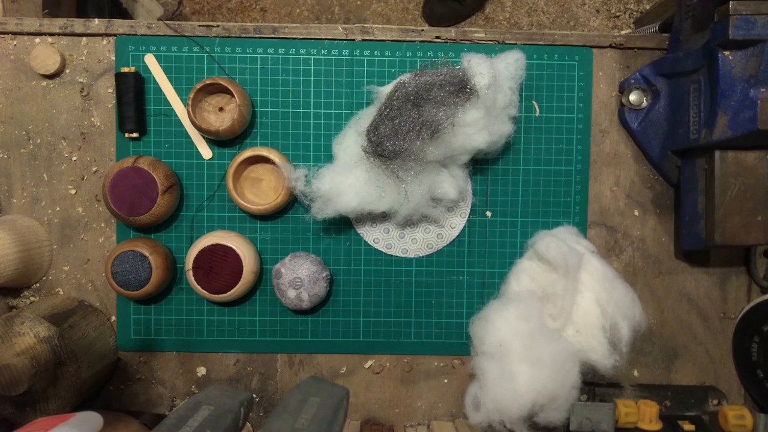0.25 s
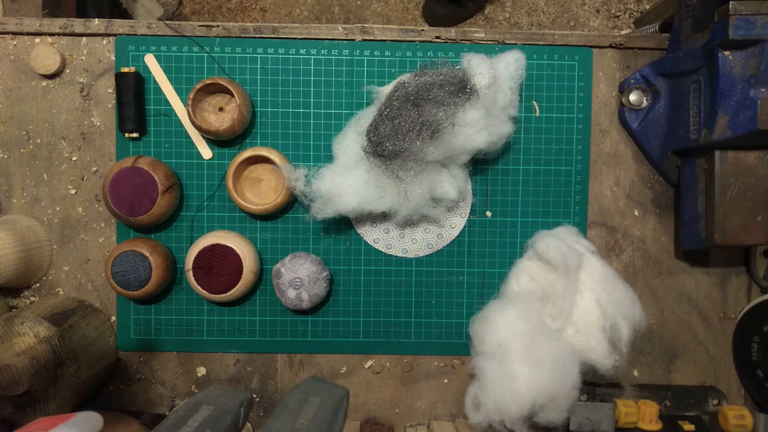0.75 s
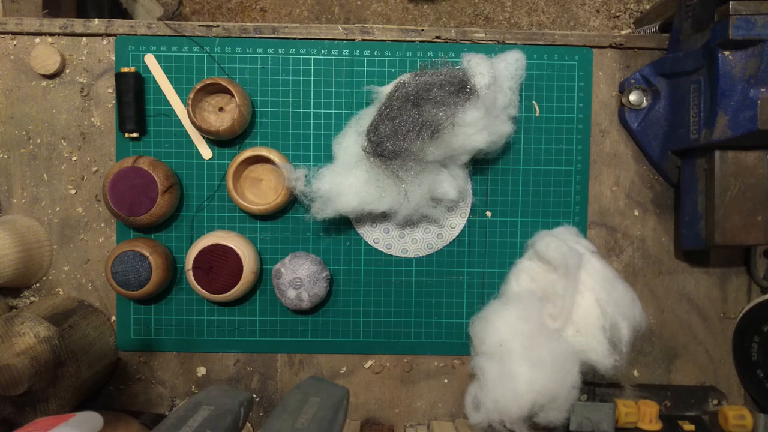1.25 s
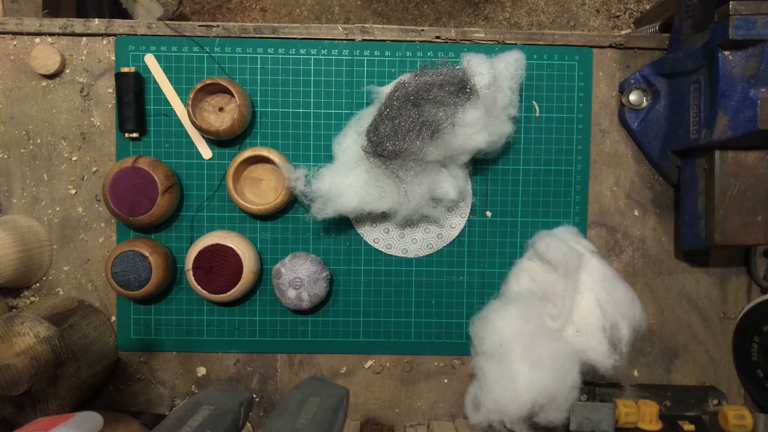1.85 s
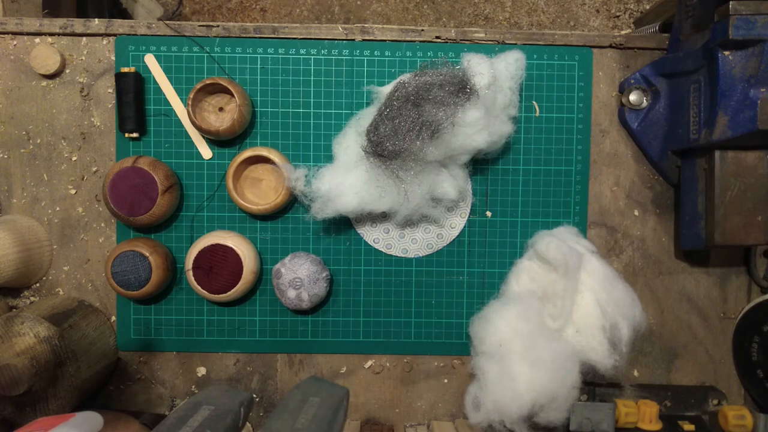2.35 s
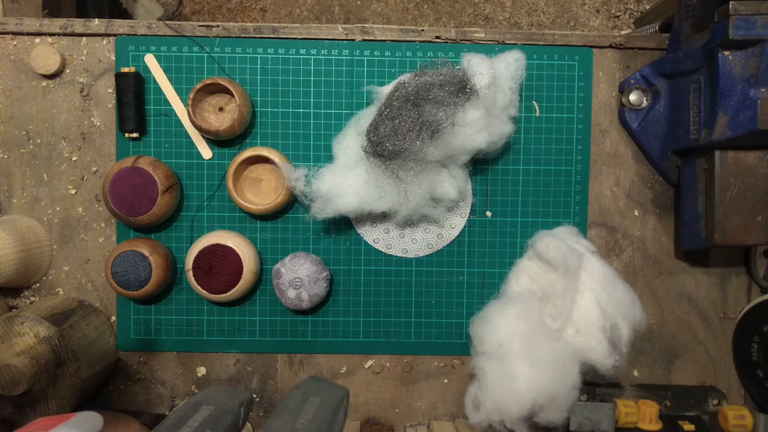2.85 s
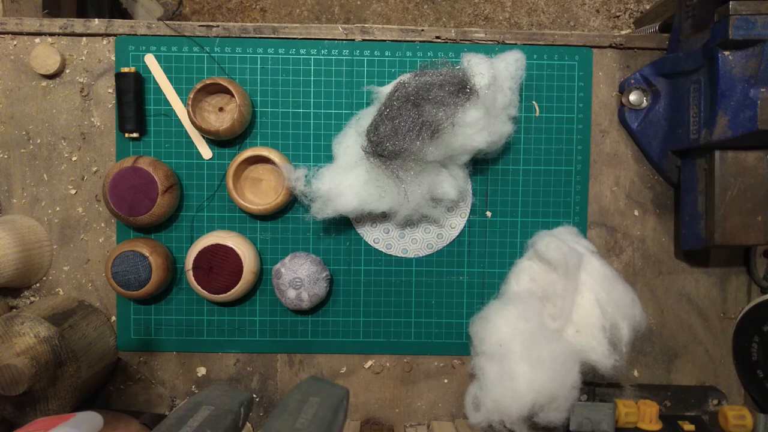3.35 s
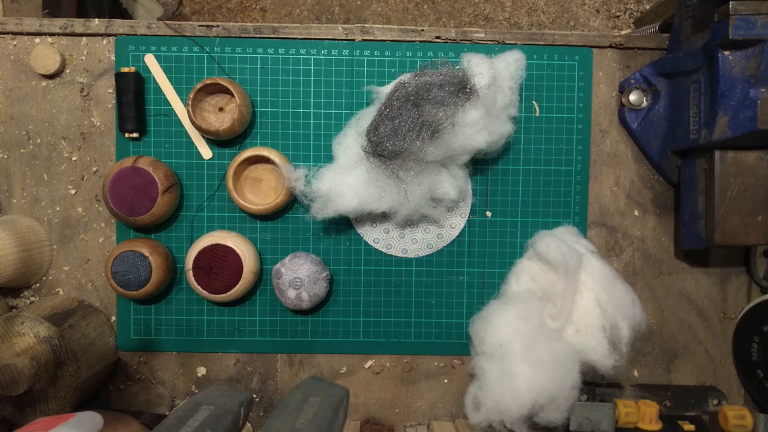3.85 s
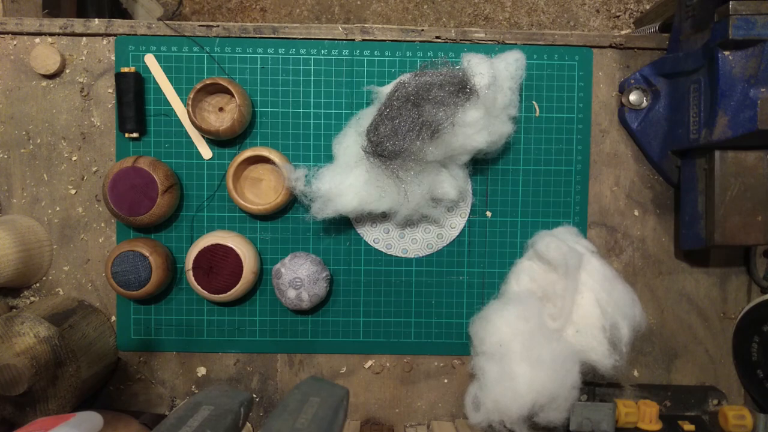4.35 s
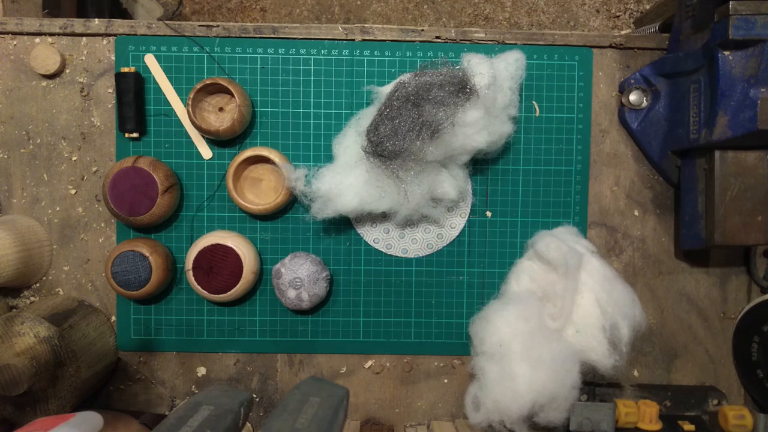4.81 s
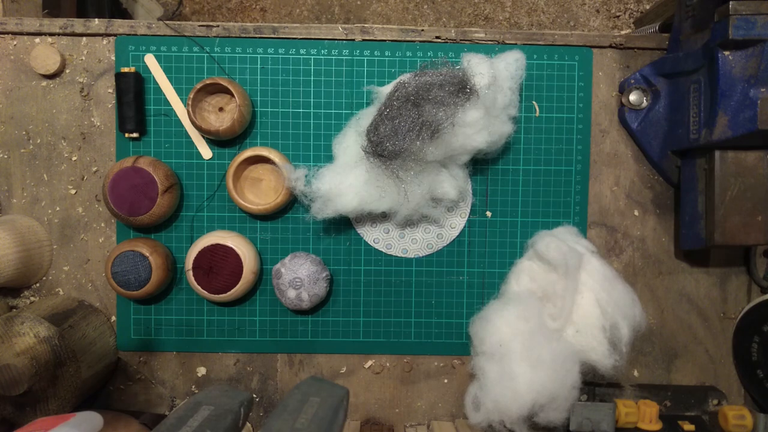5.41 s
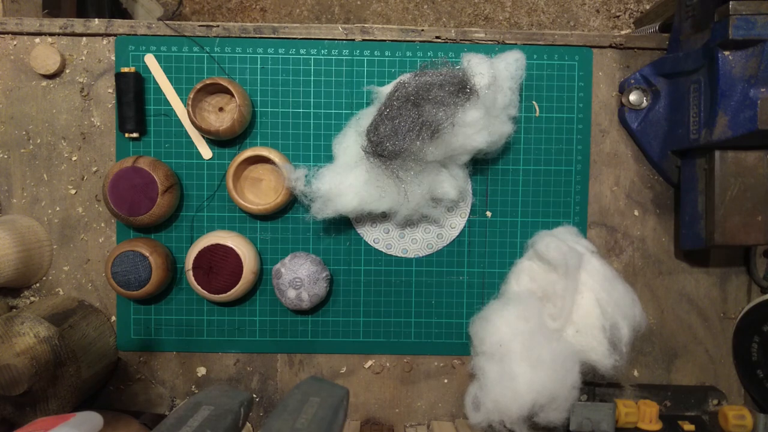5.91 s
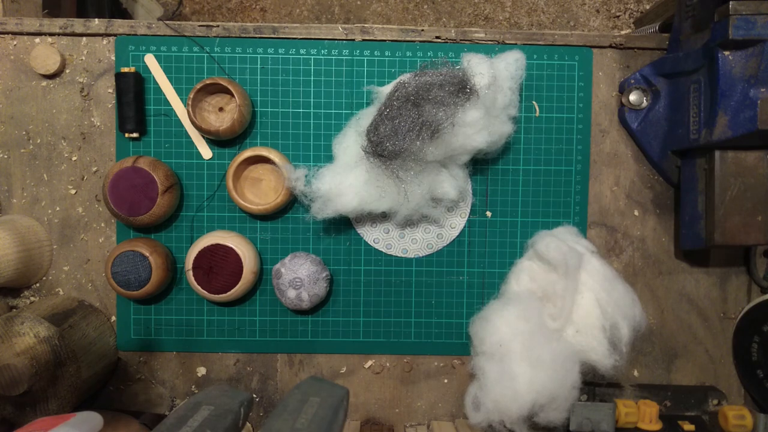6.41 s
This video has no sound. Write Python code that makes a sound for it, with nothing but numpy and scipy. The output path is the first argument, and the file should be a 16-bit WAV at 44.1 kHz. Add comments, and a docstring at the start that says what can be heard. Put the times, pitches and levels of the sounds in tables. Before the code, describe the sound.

A quiet workshop, heard close in stereo with short, dull echoes. From 0 to 0.7 s, soft stuffing and steel wool are rubbed in quick, light strokes: a grainy mid rustle, tiny wiry crackles and a bright airy hiss. Handling then thins to faint touches. At about 1.0 s a tool moves slightly, and at 1.25 s it clinks on the bench with a thin metallic ring, cut short after 1.4 s. A faint slide and tiny taps follow to 1.9 s, then near quiet. At 2.78 s a wooden piece knocks hard and bounces, rattling out by 3.1 s. From 3.25 s rustling returns, fullest around 3.9 to 4.6 s, with small clicks near 3.5 and 5.3 s and dull low knocks around 5.85 s. It fades after 6.3 s. Low rumble swells unevenly throughout; a faint far engine throbs from 3 to 5.6 s, rising then falling in pitch.

```python
"""A soft rustle, as stuffing and steel wool are handled on a bench, with a bright hiss that follows it.
Low rumble swells and sinks below. These are shaped stereo noise; tool, wood and bench are ringing notes.
A metal tool slides and clinks, a wooden piece drops and bounces, and small knocks come and go.
Later a far engine note, one gliding sine, throbs. Short echoes of the shop follow the blows."""
import sys
import numpy as np
from scipy import signal
from scipy.io import wavfile

SR = 44100
rng = np.random.default_rng(int(sys.argv[2]) if len(sys.argv) > 2 else 0)


def bounce(signal):
    """Save signal as a 16-bit WAV file at the path given by the first command-line argument."""
    frames = np.transpose(np.atleast_2d(signal))
    limited = np.clip(frames, -1, 1)
    pcm = np.round(limited * 32767).astype(np.int16)
    wavfile.write(sys.argv[1], SR, pcm)


N = 294147

# Level of the low rumble before the bass cut: t/s, level/dB
RUMBLE_LEVEL = [(0.0, -47), (1.13, -64), (1.26, -45), (1.52, -56), (2.71, -61), (2.8, -35), (3.03, -42),
                (3.1, -57.5), (3.94, -55.5), (4.07, -49.5), (4.18, -57.5), (5.31, -58), (5.39, -45.5),
                (5.52, -63), (5.66, -47.5), (5.81, -49), (5.89, -41), (5.93, -60.5), (6.18, -40.5),
                (6.67, -53)]
# Tone balance of the rumble: f/Hz, level per Hz/dB
RUMBLE_SPECTRUM = [(20, -48), (36, -25), (52, -3.5), (66, 5.5), (85, -6), (110, -29), (150, -52)]
# Tone balance of the quiet shop: f/Hz, level per Hz/dB
QUIET_SPECTRUM = [(71, -9), (120, -14.5), (181, -10), (643, -12.5), (789, -18), (968, -12.5), (1210, -17),
                  (6630, -28), (15000, -25.5), (16000, -31)]
# How alike left and right are (1 = the same, 0 = unrelated): f/Hz, likeness
LIKENESS_CURVE = [(60, 1), (200, 0.76), (400, 0.89), (700, 0.74), (1300, 0.085), (2400, 0.13),
                  (4400, -0.097), (8000, 0.88), (14000, 0.94)]
# Strokes of the rustle, with hiss and murmur: start t/s, length/s, swell from start to end/dB,
# rustle level halfway/dB, hiss above the rustle/dB, murmur above the rustle/dB
RUB_STROKES = [(0.004, 0.052, -11, -53.5, 0, -11), (0.07, 0.062, 0.5, -58, 0.5, -13),
               (0.159, 0.073, -0.5, -62.5, 4.5, -4.5), (0.255, 0.11, -1, -54, 1, -10),
               (0.384, 0.073, -2, -52, 1.5, -11), (0.442, 0.088, 5, -53, 1.5, -13),
               (0.56, 0.041, 0.5, -56, -1.5, -11), (0.644, 0.03, -2, -66.5, -1, -16),
               (0.759, 0.14, -14, -80.5, -3, 2), (1.026, 0.046, 0, -65.5, -11, 9.5),
               (1.098, 0.12, -10, -75, -4.5, 1), (1.269, 0.085, -4.5, -57.5, -14, 9.5),
               (1.384, 0.032, 7, -71.5, 3.5, 3), (1.429, 0.48, -16, -76, -9, 7),
               (1.648, 0.036, 0, -63.5, -14, 5.5), (1.696, 0.17, 1, -65.5, -7.5, 3),
               (1.819, 0.036, -2, -73, -3, 0), (1.903, 0.02, -2, -75.5, 8, 6),
               (2.086, 0.062, -1, -80.5, 3.5, 4), (2.349, 0.12, 3, -81, 4.5, 4.5),
               (2.827, 0.23, -4, -71, 3, 10), (3.242, 0.027, -1.5, -64, 0.5, -7),
               (3.311, 0.14, -2, -58, 4.5, -8.5), (3.46, 0.075, 1.5, -53.5, 2.5, -7),
               (3.574, 0.065, 4, -59.5, 4, -6), (3.652, 0.084, 1.5, -54.5, 4, -13),
               (3.759, 0.11, 9, -53.5, 0, -18), (3.871, 0.048, 2, -45.5, 1, -22),
               (3.947, 0.1, -8.5, -49, 0.5, -11), (4.068, 0.041, 2.5, -56, 7, -16),
               (4.119, 0.062, 2.5, -54, 2.5, -16), (4.227, 0.095, 2.5, -50.5, 0.5, -21),
               (4.349, 0.1, -4.5, -48.5, -0.5, -21), (4.447, 0.13, 8, -53, 1, -10),
               (4.593, 0.158, 0, -52, 1, -11), (4.789, 0.11, 5.5, -63, 2, -5),
               (4.919, 0.075, 3, -52, -1, -10.5), (5.026, 0.12, 0, -63.5, 1, -6),
               (5.186, 0.061, 1.5, -61.5, 2.5, -14), (5.293, 0.094, 1.5, -59.5, -3.5, -4.5),
               (5.409, 0.1, -1, -66, 1, -1), (5.543, 0.026, -4, -56, -2.5, -5),
               (5.589, 0.057, -2, -57.5, -0.5, -6), (5.655, 0.078, -0.5, -49, -6, -7),
               (5.769, 0.082, 10, -53.5, -1, -4), (5.869, 0.12, 5, -60, -1.5, -3),
               (5.996, 0.091, -3, -57, -4.5, -8), (6.086, 0.037, 5, -52.5, -1.5, -4.5),
               (6.146, 0.11, 4.5, -50, -2, -2), (6.271, 0.131, 3.5, -62, -2, -7),
               (6.435, 0.096, -4, -68.5, -14, 1), (6.56, 0.13, 6, -75.5, -19, -2)]
# Tone balances of the hiss, rustle and murmur: f/Hz, level per Hz/dB
HISS_SPECTRUM = [(1290, -1), (2200, -3), (2350, -1), (4920, -5), (6310, -10), (9100, -10.5), (14800, -6.5),
                 (16000, -8)]
RUSTLE_SPECTRUM = [(150, -44), (250, -12), (364, -8.5), (406, -3.5), (627, -2.5), (808, -6), (957, -2.5),
                   (1090, -5.5), (1340, -3), (4500, -26), (5850, -57), (9900, -120)]
MURMUR_SPECTRUM = [(110, -53), (140, 2.5), (180, -5), (230, -10), (320, -14)]
# Hollow things the rustle rings in: f/Hz, width/Hz, level/dB
HOLLOW_TONES = [(414, 28, -1), (491, 82, 0.5), (612, 22, 3), (952, 93, 2.5), (1370, 35, 2.5),
                (2010, 27, 6.5), (2472, 16, 9), (3470, 91, 10)]
# Sudden rises or dips of the rustle and hiss, fading back: t/s, jump in level/dB, fade to 1/e /s
LEVEL_JUMPS = [(0.256, 1.5, 0.1), (.65, 8.5, 0.013), (1.021, 2, 0.025), (1.41, -6, 0.024),
               (1.652, -0.5, 0.019), (3.307, -2, 0.016), (3.522, 2.5, 0.028), (3.632, 5, 0.056),
               (4.159, -1.5, 0.0078), (4.842, 7, 0.015), (5.31, 6, 0.012), (5.384, 5.5, 0.0097),
               (5.656, 3.5, 0.046), (5.835, -1, 0.012), (6.09, 1, 0.031)]
# The tool slides: start t/s, end t/s, then the modes that sing are those whose
# t60 in TOOL_MODES lies between: shortest t60/s, longest t60/s
SLIDE_TIMES = [(1.02, 1.18, 0, .2), (1.65, 1.93, .2, .72)]
# Drive for each slide: song of the tool level/dB, shaking of the bench level/dB
SLIDE_DRIVES = [(-96, -96.5), (-101, -89)]
# Ringing modes of the steel tool: f/Hz, level/dB, t60 (time to fall 60 dB)/s
TOOL_MODES = [(728, -15.5, 0.6), (884, -8, 0.062), (1297, -15.5, 1.34), (1656, -4.5, 0.095),
              (2005, -13, 0.57), (1980, -15, 1.36), (2880, -12, 0.033), (2994, 15.5, 0.029),
              (3100, -12, 0.06), (3587, -14, 0.61), (3885, -4.5, 0.3), (4070, -21, 0.75), (4360, -27, 1.1),
              (4640, -6.5, 0.09), (5880, -7, 0.45), (6955, -16.5, 1.8), (9300, -43, 0.14), (9787, -35, 1.2)]
# Modes of the bench top: f/Hz, level under the tool/dB, level under the wood/dB, t60/s
BENCH_MODES = [(56.3, -2, -7, 0.25), (104.9, 2, -18, 0.49), (153.4, -34, -0.5, 0.29), (184, 5.5, 0.5, 0.19),
               (284, -22, -3.5, 0.15), (332, -3.5, -8.5, 0.11), (410, 3.5, -25, 0.072), (542, 5, -2, 0.048)]
# Small knocks, each on a thing of its own, before softening: t/s, level/dB, f/Hz, t60/s
KNOCK_NOTES = [(1.03, -60, 167, 0.25), (1.83, -54, 1550, 0.11), (1.841, -53, 1995, 0.12),
               (3.25, -53, 677, 0.072), (3.501, -41, 1295, 0.056), (4.583, -43.5, 193.2, 0.095),
               (5.311, -41, 1610, 0.03), (5.313, -46, 3750, 0.04), (5.341, -37, 1370, 0.064),
               (5.359, -49, 137, 0.16), (5.838, -32.5, 166, 0.071), (5.87, -32, 69.4, 0.05)]
# Contacts of the clinking tool: t/s, ring level/dB, thump level/dB, clatter level/dB
CLINK_HITS = [(1.2535, -34.5, -51, -8), (1.263, -62, -36.5, -5), (1.299, -59, -44, -12)]
# Contacts of the wood: t/s, knock level/dB, thump level/dB, crack level/dB, bright edge level/dB,
# fade of the contact to 1/e /s (20 ms at most is used)
DROP_HITS = [(2.779, -33, -52, -41, -60, 0.0046), (2.788, -23.5, -28.5, -8.5, -24, 0.014),
             (2.808, -44, -34, -11.5, -38, 0.014), (2.83, -36, -45, -11, -49, 0.013),
             (2.838, -27.5, -32, -8.5, -46, 0.015), (2.911, -42.5, -50, -18.5, -50, 0.022),
             (2.971, -36.5, -44, -30, -55, 0.013), (3.055, -40.5, -63, -30, -62, 0.01),
             (3.121, -80, -69, -33.5, -58, 0.005)]
# Modes of the wooden piece: f/Hz, level/dB, t60/s
WOOD_MODES = [(480, -2, 0.038), (720, -4, 0.025), (944, 0.5, 0.042), (1120, -8, 0.032), (1320, -4, 0.032),
              (1810, -7.5, 0.017), (2260, -10, 0.017), (2860, -8, 0.011)]
# Far engine before its throb: t/s, f/Hz, level/dB
ENGINE_GLIDE = [(3.05, 87.1, -52.5), (3.31, 89.7, -47.5), (3.6, 95.8, -48), (3.9, 100.2, -41.5),
                (4.29, 109.8, -51.5), (4.71, 115.3, -46), (5.0, 112, -53), (5.31, 100, -64),
                (5.6, 91, -54.5)]
# Times when the engine note nearly dies: t/s
ENGINE_LULLS = [2.98, 3.2, 3.51, 3.77, 3.95, 4.14, 4.33, 4.47, 4.6, 4.75, 4.93, 5.28, 5.6]

QUIET_DB = -73.5
RUB_RISE_DB_PER_S, RUB_FALL_DB_PER_S = 995, 495
WAVER_SPREAD_DB, WAVER_RATE_HZ = 1.23, 22   # the level wavers at random
RING_CUT_S, RING_FADE_S = 1.408, 0.068   # from here the metal ring fades quickly, to 1/e in this time
RIGHT_LAG_S = 0.00018   # the tool and the small knocks reach the left microphone first
WOOD_SPREAD_HZ = 1050   # from here up the rattle reaches each microphone differently
THROB_DEPTH = 0.84   # share of the engine note that dies in each lull
SHOP_T60_S, WALL_CUT_HZ, SHOP_DB = 0.28, 2470, -13.5   # treble dies sooner than this t60
LEFT_OVER_RIGHT_DB = 2.5
BASS_CUT_HZ, TOP_CUT_HZ = 46, 15740


def amp(db):
    """Turn decibels into a gain."""
    return 10 ** (np.asarray(db) / 20)


def unit(x):
    """Scale to rms 1."""
    return x / np.sqrt(np.mean(x ** 2) + 1e-20)


def in_time(rows):
    """Read each column of a curve at every sample."""
    times, *columns = np.transpose(rows)
    return [np.interp(np.arange(N) / SR, times, column) for column in columns]


def at_hz(points, hz):
    """Read a spectrum on a log-frequency axis."""
    points = np.array(points)
    return np.interp(np.log(hz), np.log(points[:, 0]), points[:, 1])


def bandpass(x, low_hz, high_hz):
    """Keep mostly what lies between two frequencies."""
    return signal.sosfilt(signal.butter(2, [low_hz, high_hz], "band", fs=SR, output="sos"), x)


def drift(rate_hz):
    """Slow random wander of rms 1: smoothed noise, made at every 40th sample."""
    r = np.exp(-80 * np.pi * rate_hz / SR)
    noise = rng.standard_normal(N // 40 + 2002)
    slow = signal.lfilter([1], [1, -2 * r, r * r], noise)[2000:]   # skip the filter's start
    return np.interp(np.arange(N) / 40, np.arange(len(slow)), unit(slow))


def ring(force, hz, t60):
    """A resonance: a unit click starts a fading sine of height 1; t60 is at least 10 ms."""
    r = np.exp(-np.log(1000) / (max(t60, .01) * SR))
    w = 2 * np.pi * hz / SR
    return signal.lfilter([0, np.sin(w)], [1, -2 * r * np.cos(w), r * r], force + 1e-18)


def clicks(times, db):
    """Single-sample pushes."""
    out = np.zeros(N)
    out[(times * SR).astype(int)] = amp(db)
    return out


def bursts(times, db, fades):
    """Rough contacts: fading noise, each with the energy of one click."""
    out = np.zeros(N)
    for time, level_db, fade in zip(times, db, fades):
        envelope = np.exp(-np.arange(2000) / SR / np.clip(fade, .0005, .02))
        noise = envelope * rng.standard_normal(2000)
        at = round(time * SR)
        out[at:at + 2000] += amp(level_db) * noise / np.sqrt(np.sum(noise ** 2))
    return out


def coloured(spectrum, patchy_db, grain_db):
    """Stereo noise of rms 1 in roughly third-octave bands, with shared and separate flicker, and grain."""
    low_hz, high_hz = spectrum[0][0], spectrum[-1][0]
    edges = np.geomspace(low_hz, high_hz, int(3 * np.log2(high_hz / low_hz)) + 2)
    grain = amp(grain_db * np.minimum(rng.exponential(1, N), 5))
    white = rng.standard_normal((2, 2, N)) * grain
    out, together = 0, drift(36.7)
    for k, (low, high) in enumerate(zip(edges, edges[1:])):
        mid, side = bandpass(white[k % 2], low, high)   # neighbouring bands use different noise
        hz = np.sqrt(low * high)
        alike = np.clip(at_hz(LIKENESS_CURVE, hz), -1, 1)
        gain = amp(at_hz(spectrum, hz) + patchy_db * (together + 1.14 * drift(5.27)))
        out = out + gain * (np.sqrt(1 + alike) * mid + np.sqrt(1 - alike) * side * [[1], [-1]])
    return unit(out)


def rumble():
    """Low rumble that swells and sinks: deep noise that follows a level curve."""
    level_db, = in_time(RUMBLE_LEVEL)
    return amp(level_db) * coloured(RUMBLE_SPECTRUM, patchy_db=-1.23, grain_db=0.0)


def quiet_shop():
    """The quiet of the shop: faint noise at a steady average level."""
    return amp(QUIET_DB) * coloured(QUIET_SPECTRUM, patchy_db=1.1, grain_db=-2.0)


def rubs():
    """Gains of rustle, hiss and murmur: each rub rises, swells or sinks evenly, and falls; powers add."""
    t = np.arange(0, N, 64) / SR
    start, length, swell_db, rustle_db, hiss_db, murmur_db = np.transpose(RUB_STROKES)[:, :, None]
    end = start + length
    shape_db = rustle_db + swell_db * (np.clip((t - start) / length, 0, 1) - .5)
    shape_db = shape_db - RUB_RISE_DB_PER_S * np.maximum(start - t, 0)
    shape_db = shape_db - RUB_FALL_DB_PER_S * np.maximum(t - end, 0)
    waver = amp(WAVER_SPREAD_DB * drift(WAVER_RATE_HZ))
    gains = []
    for above_db in (0, hiss_db, murmur_db):
        total = np.sqrt(np.sum(amp(shape_db + above_db) ** 2, axis=0))
        gains.append(waver * np.interp(np.arange(N) / SR, t, total))
    return gains


def hollowed(x):
    """Hollow things nearby colour a sound with narrow resonances."""
    out = x.copy()
    for hz, width, db in HOLLOW_TONES:
        r = np.exp(-np.pi * width / SR)
        top = np.array([1, 0, -1]) * (1 - r * r) / 2
        bottom = [1, -2 * r * np.cos(2 * np.pi * hz / SR), r * r]
        out += amp(db) * signal.lfilter(top, bottom, x)
    return unit(out)


def crackle(per_s, cycles):
    """Wires snap past each other: brief rings dealt at random to 24 pitches, each placed in stereo."""
    sizes = amp(2.0 * np.minimum(rng.exponential(1, N), 5)) * rng.choice([-1, 1], N)
    sizes = sizes * (rng.random(N) < per_s / SR)   # keep about per_s snaps a second
    pitches, dealt = np.geomspace(700, 6000, 24), rng.integers(0, 24, N)
    out = np.zeros((2, N))
    for k, hz in enumerate(pitches):
        snaps = ring(sizes * (dealt == k), hz, cycles / hz) / np.sqrt(hz)
        sides = [[1], [rng.uniform(-1.14, 1)]]
        out += snaps * sides[::(-1) ** k]   # left and right swap roles from pitch to pitch
    return unit(out)


def handling():
    """A soft mid rustle with snaps, a bright hiss that swells and drops along with it, and a low murmur."""
    t = np.arange(N) / SR
    jumps_db = np.zeros(N)
    for start, jump_db, fade in LEVEL_JUMPS:
        jumps_db += jump_db * (t >= start) * np.exp(-np.maximum(t - start, 0) / fade)
    rustle_gain, hiss_gain, murmur_gain = rubs()
    hiss = hiss_gain * coloured(HISS_SPECTRUM, patchy_db=0.99, grain_db=1.5)
    rustle = rustle_gain * hollowed(coloured(RUSTLE_SPECTRUM, patchy_db=1.5, grain_db=3.0))
    murmur = murmur_gain * coloured(MURMUR_SPECTRUM, patchy_db=3.5, grain_db=2.0)
    snaps = rustle_gain * amp(-6) * crackle(per_s=450, cycles=17)
    return amp(jumps_db) * (hiss + rustle + snaps) + murmur


def sliding():
    """Friction noise makes some modes of the tool sing faintly, and other noise shakes the bench."""
    t, out = np.arange(N) / SR, np.zeros(N)
    rub = bandpass(rng.standard_normal(N), 1700, 4500)
    for (start, end, shortest, longest), (song_db, bench_db) in zip(SLIDE_TIMES, SLIDE_DRIVES):
        moving = (t > start) & (t < end)
        fading = np.exp(-np.maximum(t - end, 0) / .015)   # song and shaking fade quickly after the slide
        friction = amp(song_db + 2.8 * drift(15.0)) * rub * moving
        shake = amp(bench_db + 5.0 * drift(28.0)) * rng.standard_normal(N) * moving
        # the modes ring half as long here, and their levels in dB are halved
        song = sum(amp(db / 2) * ring(friction, hz, t60 / 2)
                   for hz, db, t60 in TOOL_MODES if shortest < t60 < longest)
        bench = sum(ring(shake, hz, t60) for hz, _, _, t60 in BENCH_MODES[3:])
        out += fading * (song + bench)
    return out


def knocks():
    """Small things are nudged, each with one note, dulled by a soft contact."""
    out = np.zeros(N)
    for time, db, hz, t60 in KNOCK_NOTES:
        nudge = np.zeros(N)
        nudge[round(time * SR)] = amp(db)
        out += ring(nudge, hz, t60)
    return signal.lfilter([.3], [1, -.7], out)


def thump(times, db, column):
    """The bench top booms under a blow; the striking thing's column sets the strength of each mode."""
    pushes = clicks(times, db)
    return sum(amp(mode[column]) * ring(pushes, mode[0], mode[3]) for mode in BENCH_MODES)


def clatter(times, db, fades, low_hz, high_hz):
    """The broad crack of a contact: a band of noise bursts."""
    return bandpass(bursts(times, db, fades), low_hz, high_hz)


def clink():
    """A steel tool lands: thin ringing modes, a thump and a crack."""
    times, ring_db, thump_db, clatter_db = np.transpose(CLINK_HITS)
    taps = clicks(times, ring_db)
    fading = np.exp(-np.maximum(np.arange(N) / SR - RING_CUT_S, 0) / RING_FADE_S)
    rings = np.zeros(N)
    for k, (hz, db, t60) in enumerate(TOOL_MODES):
        rings += (-1) ** k * amp(db) * ring(taps, hz, t60)   # neighbours start in opposite directions
    crack = clatter(times, clatter_db, np.full(len(times), .012), 320, 2350)
    return fading * rings + thump(times, thump_db, 1) + crack


def drops():
    """A wooden piece hits the bench and bounces to rest: rough contacts drive its short modes."""
    times, knock_db, thump_db, crack_db, edge_db, fades = np.transpose(DROP_HITS)

    def rattle(modes):
        return sum(ring(bursts(times, knock_db + db, fades), hz, t60) for hz, db, t60 in modes)

    low_modes = [mode for mode in WOOD_MODES if mode[0] < WOOD_SPREAD_HZ]
    high_modes = [mode for mode in WOOD_MODES if mode[0] >= WOOD_SPREAD_HZ]
    shared = thump(times, thump_db, 2) + clatter(times, edge_db, fades, 5500, 15500) + rattle(low_modes)
    # fresh noise for each microphone
    spread = [clatter(times, crack_db, fades, 1130, 3870) + rattle(high_modes) for _ in range(2)]
    return shared + np.array(spread)


def engine():
    """One low order of a far motor: a single sine that throbs as it glides."""
    hz, level_db = in_time(ENGINE_GLIDE)
    t = np.arange(N) / SR
    fade_in = np.clip((t - ENGINE_GLIDE[0][0]) / 0.027, 0, 1)
    fade_out = np.clip((ENGINE_GLIDE[-1][0] - t) / 0.036, 0, 1)
    throbs = np.interp(t, ENGINE_LULLS, np.arange(len(ENGINE_LULLS)))   # a whole number at each lull
    throb = 1 - THROB_DEPTH * (1 - np.abs(np.sin(np.pi * throbs)))
    note = np.sqrt(2) * np.sin(2 * np.pi * np.cumsum(hz) / SR)
    return fade_in * fade_out * throb * amp(level_db) * note


def shop(x):
    """Echoes of the shop: eight feedback delays a side, duller on every round, with the bass removed."""
    out, dull = np.zeros((2, N)), np.exp(-2 * np.pi * WALL_CUT_HZ / SR)
    lags = (rng.uniform(.008, .03, 16) * SR).astype(int)
    for k, lag in enumerate(lags):
        loop, state = x.copy(), [0.]
        gain = amp(-60 * lag / SR / SHOP_T60_S)
        for i in range(lag, N, lag):
            back, state = signal.lfilter([gain * (1 - dull)], [1, -dull], loop[i - lag:i], zi=state)
            loop[i:i + lag] += back[:N - i]
        out[k % 2] += (loop - x) * (-1) ** (k // 2)   # echoes only, with mixed signs
    return signal.sosfilt(signal.butter(2, 550, "high", fs=SR, output="sos"), out)


def scene():
    """Blows with their echoes, over handling, rumble, engine and the quiet of the shop."""
    blows = sliding() + knocks() + clink()
    wood = drops()
    late = np.interp(np.arange(N) - RIGHT_LAG_S * SR, np.arange(N), blows)
    direct = np.array([blows, late]) + wood
    echoes = amp(SHOP_DB) * shop(blows + wood[0])
    return direct + echoes + rumble() + quiet_shop() + handling() + engine()


def record(dry):
    """The left microphone is more sensitive; deep bass and the top are cut."""
    wet = dry * amp([[LEFT_OVER_RIGHT_DB / 2], [-LEFT_OVER_RIGHT_DB / 2]])
    wet = signal.sosfilt(signal.butter(4, BASS_CUT_HZ, "high", fs=SR, output="sos"), wet)
    return signal.sosfilt(signal.ellip(12, .5, 60, TOP_CUT_HZ, fs=SR, output="sos"), wet)


dry = scene()
out = record(dry)
bounce(out)
```